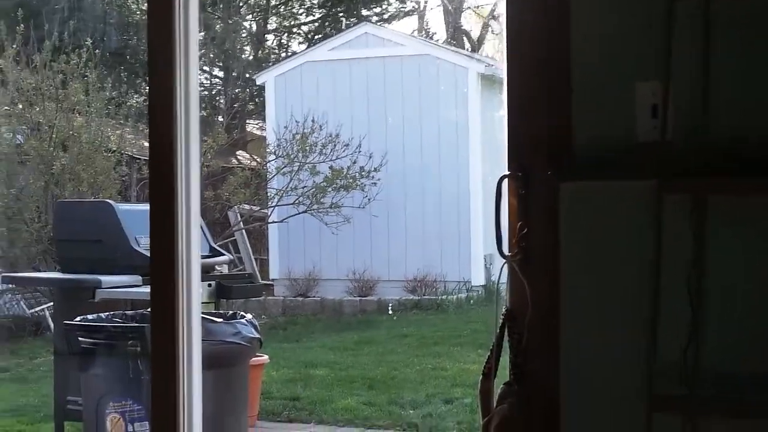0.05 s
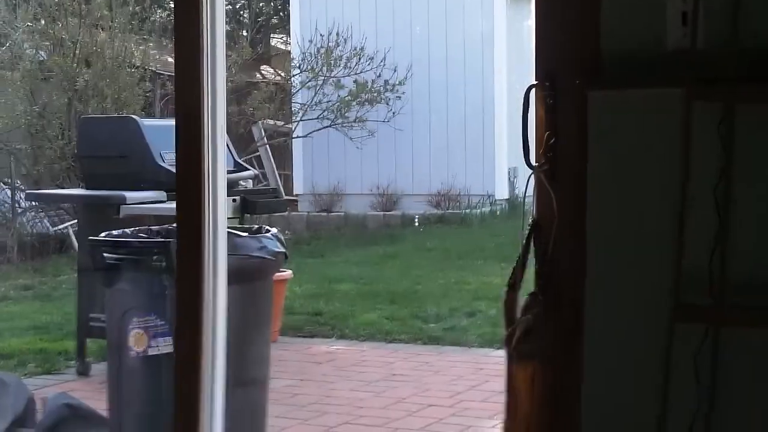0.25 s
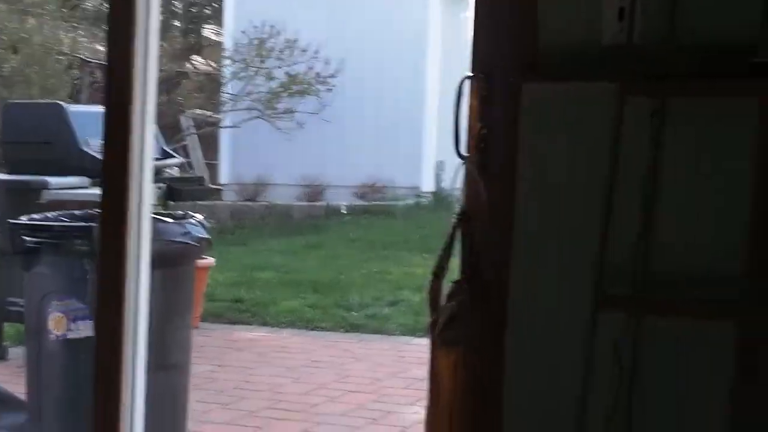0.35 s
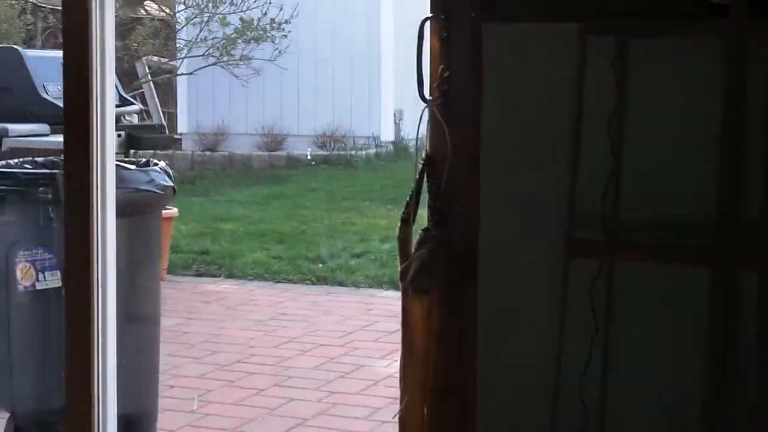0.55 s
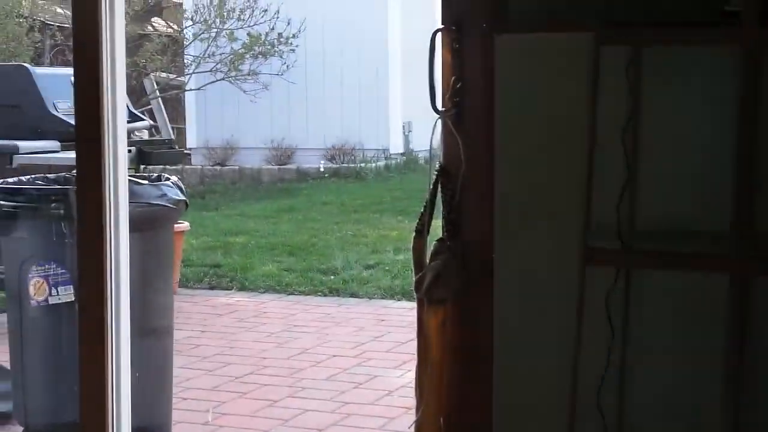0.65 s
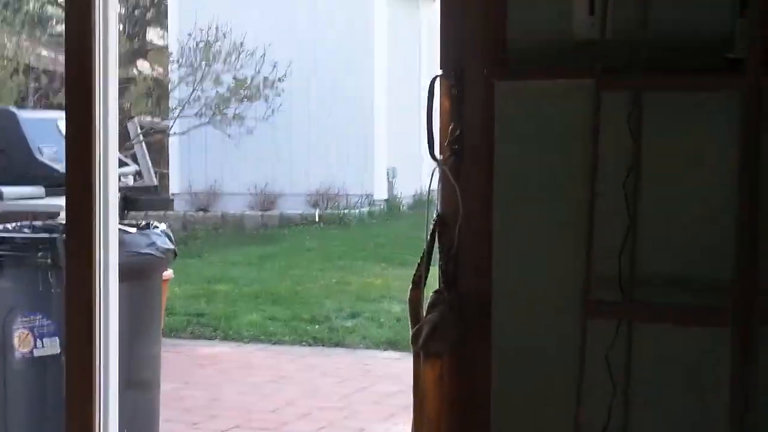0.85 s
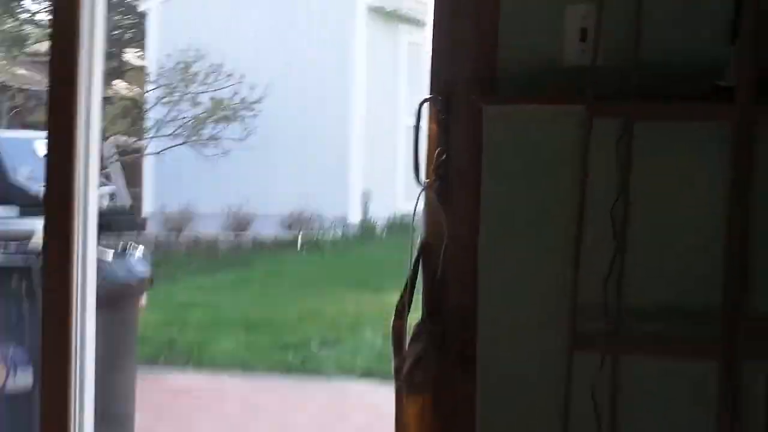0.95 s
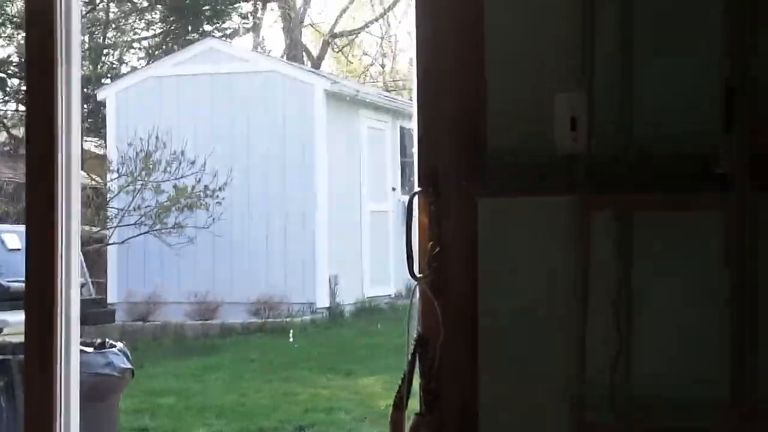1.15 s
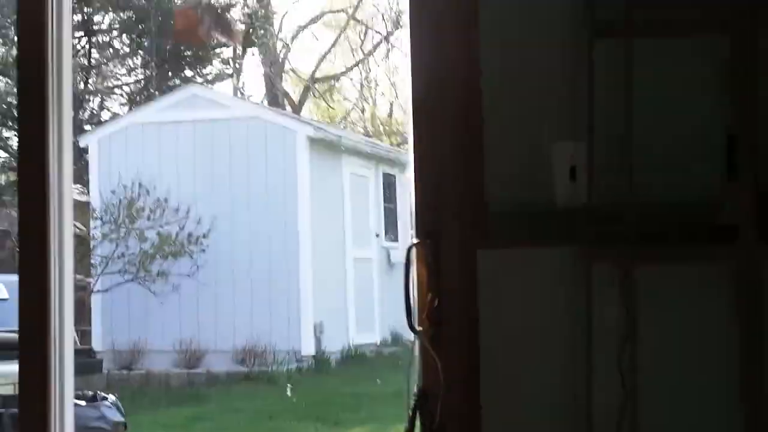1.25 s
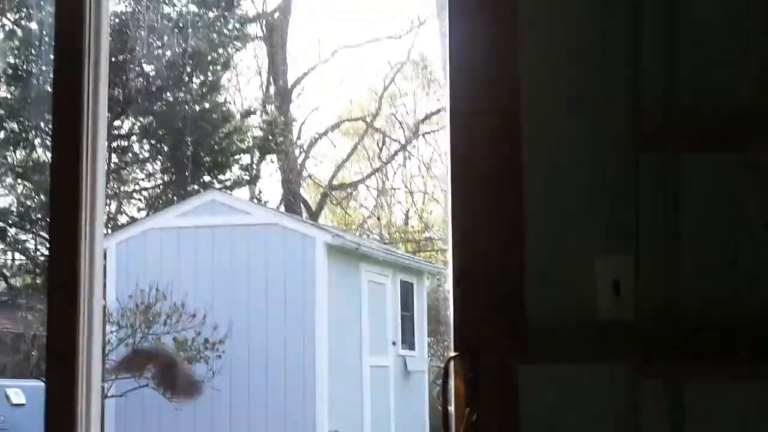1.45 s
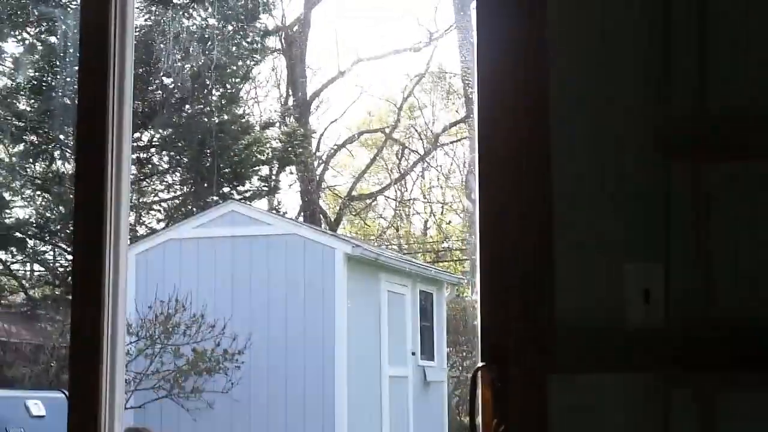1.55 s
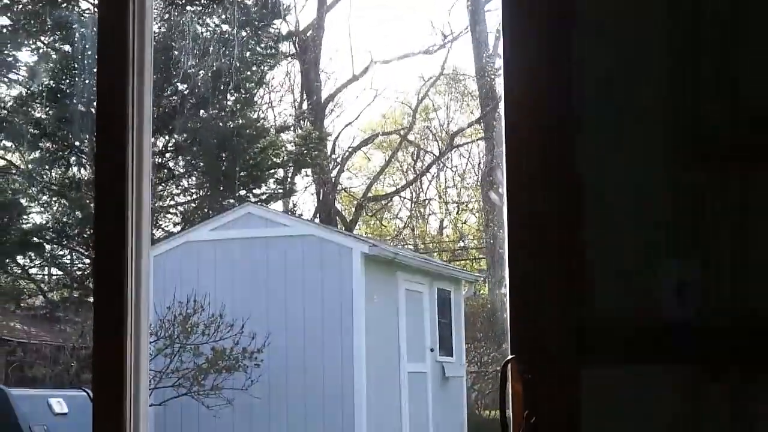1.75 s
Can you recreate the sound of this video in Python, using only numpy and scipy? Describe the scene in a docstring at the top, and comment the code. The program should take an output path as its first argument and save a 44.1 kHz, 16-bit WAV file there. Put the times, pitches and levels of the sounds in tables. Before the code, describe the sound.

A bird thumps against a glass door, heard indoors over low room noise and handling rumble. At 0.2 seconds a small sharp click sounds by the microphone, then a light cloth swish. A whoosh rises from about 0.55 seconds until the dull strike at 0.85, with a brief ring, low boom and brush of feathers. A weaker bump follows near 1.1 seconds and dies away.

```python
"""Indoors by a glass door, hand-held microphone. Low room noise, handling rumble and a faint rustle lie
underneath from the start. At 0.2 s comes a sharp little click right at the microphone, then a light
swish of cloth. From 0.55 s a whoosh of air rises until a bird strikes the glass at 0.85 s: its soft
body thuds, the pane rings briefly and booms as it flexes, and feathers brush it. At 1.06 s a weaker
bump knocks in the frame and dies away in the room."""
import sys
import numpy as np
from scipy import signal
from scipy.fft import rfft, irfft, next_fast_len
from scipy.io import wavfile
from scipy.ndimage import map_coordinates

SR = 44100
rng = np.random.default_rng(int(sys.argv[2]) if len(sys.argv) > 2 else 0)


def log_audio(samples):
    """Write samples as a 16-bit WAV file to the path given in sys.argv[1]."""
    # one column per channel
    frames = np.atleast_2d(samples).T
    # limit to full scale, then quantise
    limited = np.clip(frames, -1, 1)
    pcm = np.round(limited * 32767).astype(np.int16)
    wavfile.write(sys.argv[1], SR, pcm)


N = 79380  # 1.8 s
STRIKE_S, PRESS_S = .8545, .8803  # the bird meets the glass, then its body presses in


def amp(db):
    """Decibels to amplitude."""
    return 10 ** (np.asarray(db) / 20)


def clock():
    """Each sample's time in seconds."""
    return np.arange(N) / SR


def along(points, hz):
    """Read (Hz, value) points on a log frequency axis."""
    freqs, values = np.transpose(points)
    return np.interp(np.log(hz + 1), np.log(freqs + 1), values)


def curves(rows):
    """One value per sample for each column after the time."""
    times, *columns = np.transpose(rows)
    return [np.interp(clock(), times, column) for column in columns]


def filtered(x, response):
    """Pass x through a frequency response."""
    size = next_fast_len(N + SR // 2)
    return irfft(rfft(x, size) * response(np.fft.rfftfreq(size, 1 / SR)), size)[..., :N]


def noise(colour):
    """Coloured noise of rms 1."""
    x = filtered(rng.standard_normal(N), lambda hz: amp(along(colour, hz)))
    return x / np.sqrt(np.mean(x ** 2) + 1e-20)


def swelling_noise(level, colour):
    """Coloured noise that follows a level curve."""
    return amp(curves(level)[0]) * noise(colour)


def blow(start, rise, t60, hold=0):
    """Envelope with a soft attack, a hold and an exponential decay, all in seconds."""
    age = np.maximum(clock() - start, 0)
    return (1 - np.exp(-(age / rise) ** 2)) * amp(-60 * np.maximum(age - hold, 0) / t60)


def ring(start, hz, rise, t60, hold=0):
    """One struck mode: a decaying sine."""
    return -np.sin(2 * np.pi * hz * (clock() - start)) * blow(start, rise, t60, hold)


def pulse(start, colour):
    """One impulse through a causal filter of the given colour."""
    size = 8192
    gain = amp(along(colour, np.fft.rfftfreq(size, 1 / SR)))
    cepstrum = irfft(np.log(gain))
    cepstrum[1:size // 2] *= 2  # fold to minimum phase
    cepstrum[size // 2 + 1:] = 0
    impulse = irfft(np.exp(rfft(cepstrum)))
    return filtered(impulse, lambda hz: np.exp(-2j * np.pi * hz * start))


# Loudness of the room: time_s, level_db
ROOM_LEVEL = [(0, -54.5), (.6, -52), (1.2, -56.5), (1.45, -55), (1.62, -59), (1.8, -60)]
# Its spectrum: freq_hz, relative_db
ROOM_COLOUR = [(30, -13.5), (170, -0.5), (260, 0), (340, -1.5), (520, -2.5), (780, -2.5), (1100, -11),
               (2000, -14), (4000, -25), (10000, -28.5), (14500, -33)]

def room_noise():
    """Low, steady noise all around the microphone, drifting in level."""
    return swelling_noise(ROOM_LEVEL, ROOM_COLOUR)


# Surges of handling rumble: time_s, level_db
RUMBLE_LEVEL = [(0, -44.5), (.045, -41), (.09, -50.5), (.17, -45.5), (.24, -47), (.285, -52), (.32, -46),
                (.47, -47.5), (.62, -48), (.665, -70), (.72, -43), (.95, -48), (1.04, -53), (1.19, -45),
                (1.29, -52), (1.43, -48.5), (1.63, -54), (1.8, -51.5)]
# Its spectrum: freq_hz, relative_db
RUMBLE_COLOUR = [(20, -43), (32, -23.5), (44, 4), (62, -4), (80, 1.5), (100, -14), (135, -3), (178, 1.5),
                 (215, -5), (265, -5.5), (340, -12.5), (500, -20.5), (6000, -78.5)]

def handling_rumble():
    """The microphone moves in the hand and picks up an uneven rumble."""
    return swelling_noise(RUMBLE_LEVEL, RUMBLE_COLOUR)


# Swells of rustle: time_s, level_db
RUSTLE_LEVEL = [(0, -66), (.13, -54.5), (.28, -56), (.33, -56.5), (.42, -50), (.52, -55.5), (.62, -55.5),
                (.72, -51.5), (1.0, -51), (1.2, -64)]
# Its spectrum, peaking at 430 Hz: freq_hz, relative_db
RUSTLE_COLOUR = [(150, -18.5), (330, 1), (385, -1.5), (430, 12.5), (490, -2.5), (1000, -10.5), (2400, -13),
                 (4000, -17), (8500, -19.5), (14500, -26)]

def rustle():
    """Faint rustle of movement close to the microphone."""
    return swelling_noise(RUSTLE_LEVEL, RUSTLE_COLOUR)


# Spectrum of the click: freq_hz, relative_db
CLICK_COLOUR = [(20, -17), (90, -1), (250, -10), (600, -21.5), (1200, -28.5), (2500, -24.5), (4500, -32.5),
                (5300, -17), (6300, -12.5), (6900, -20), (7600, -8.5), (9000, -3.5), (11000, 0),
                (14500, -5), (17000, -27)]

def click(start_s=.20916, echo_delay_s=.0076):
    """A tiny hard snap right at the microphone: a low push, a short scatter, one near reflection."""
    snap = pulse(start_s, CLICK_COLOUR)
    reflection = amp(-30) * pulse(start_s + echo_delay_s, CLICK_COLOUR)
    scatter = amp(-43.5) * noise(CLICK_COLOUR) * blow(start_s, rise=.00037, t60=.049)
    return amp(10.5) * (snap + reflection) + scatter


# One swell of moving cloth: time_s, level_db
SWISH_LEVEL = [(.3, -85), (.38, -64.5), (.43, -60), (.5, -64), (.6, -71), (.7, -100)]
# Its hissy spectrum: freq_hz, relative_db
SWISH_COLOUR = [(2000, -20), (4500, -7.5), (8000, 0), (11000, -3), (14500, -8)]

def cloth_swish():
    """Cloth slides lightly, close to the microphone."""
    return swelling_noise(SWISH_LEVEL, SWISH_COLOUR)


# Rush of air and its resonance: time_s, level_db, centre_hz, width_octaves
WHOOSH_PATH = [(.55, -58.5, 330, 0.24), (.62, -43.5, 365, 0.3), (.66, -54.5, 540, 0.65),
               (.70, -44.5, 680, 0.17), (.73, -48, 1030, 0.97), (.78, -43.5, 1360, 0.8),
               (.81, -44, 1180, .8), (.85, -40.5, 1040, .8), (.88, -41, 2350, 0.96), (.91, -87, 2300, 0.64),
               (1.0, -60.5, 1950, 0.69), (1.2, -110, 2000, .8)]
# Spectrum of the broad hiss around it: freq_hz, relative_db
AIR_COLOUR = [(200, -10), (700, 0.5), (2500, -2), (4500, -10), (10000, -12), (14500, -17)]

def whoosh():
    """Rushing air at the door; its broad resonance climbs as it swells towards the strike."""
    level_db, centre_hz, width_oct = curves(WHOOSH_PATH)
    hz, frame_s, spectrum = signal.stft(rng.standard_normal(N), SR, nperseg=512)
    octaves = np.log2((hz[:, None] + 1) / np.interp(frame_s, clock(), centre_hz))
    resonance = np.exp(-(octaves / np.interp(frame_s, clock(), width_oct)) ** 2)
    low_shelf = amp(-2) / (1 + np.exp(4 * (octaves - 1)))
    shape = resonance + low_shelf
    shape /= np.sqrt(np.mean(shape ** 2, axis=0))  # equal power at every moment
    body = signal.istft(spectrum * shape, SR, nperseg=512)[1][:N]
    hiss = amp(-5) * width_oct / width_oct.max() * noise(AIR_COLOUR)
    swell = amp(level_db) * (clock() > WHOOSH_PATH[0][0])
    return swell * (body + hiss)


# Spectrum of the body's impact: freq_hz, relative_db
THUD_COLOUR = [(60, -12), (250, 4), (370, -11), (540, -1.5), (720, 6), (950, -6), (1250, -1), (1700, -16),
               (3000, -16), (6000, -30), (14000, -33)]

def body_thud():
    """The soft body hits the glass: one dull pulse in a short burst of noise."""
    impact = amp(-2) * pulse(STRIKE_S + .00194, THUD_COLOUR)
    burst = amp(-35) * noise(THUD_COLOUR) * blow(STRIKE_S, rise=.0015, t60=.076)
    return impact + burst


# Ringing modes of the pane: pitch_hz, relative_db, t60_s
PANE_MODES = [(349.7, -1.5, 0.15), (449, -12, 0.2), (655, -17, .2), (846, -3.5, 0.17), (940.5, -1, 0.16),
              (1001, -3.5, 0.17), (1404, -16, .24), (1554, -12, 0.15), (1622, -9, 0.15), (2162, -7, 0.13),
              (2284, -7.5, 0.14), (2590, -17, .14), (2745, -33, .13), (3125, -9, 0.14)]

def pane_ring(level_db=-33, lag_s_per_octave=.016, mute_db=-10, mute_s=.022):
    """The struck pane rings until the pressing body mutes it."""
    modes = np.zeros(N)
    for hz, db, t60 in PANE_MODES:
        # the contact hardens, so modes above 1100 Hz start later
        onset_s = STRIKE_S + lag_s_per_octave * max(np.log2(hz / 1100), 0)
        modes += amp(level_db + db + rng.normal(0, 1)) * ring(onset_s, hz, rise=.0018, t60=t60)
    pressure = np.clip((clock() - PRESS_S) / mute_s, 0, 1)
    return modes * amp(mute_db * pressure)


# Flexing modes of the whole pane: pitch_hz, level_db, t60_s
BOOM_MODES = [(140, -31, 0.072), (78, -48.5, 0.053), (227, -35.5, 0.081), (291, -40, 0.028)]

def pane_boom(press_length_s=.016):
    """The whole pane flexes with a low boom, held while the body presses on it."""
    return sum(amp(db) * ring(PRESS_S, hz, rise=.0021, t60=t60, hold=press_length_s)
               for hz, db, t60 in BOOM_MODES)


# Spectrum of feathers on glass: freq_hz, relative_db
FEATHER_COLOUR = [(500, -0.5), (1600, -2), (4500, -2.5), (5700, 1), (6150, 5), (6700, -1), (9000, -3),
                  (13500, -9), (15000, -21)]

def feather_brush(start_s=.8815, grain_hz=700.6, grain_db=3.5):
    """Feathers brush the pane with a short, grainy hiss."""
    flicker = map_coordinates(rng.standard_normal(N), [clock() * grain_hz])  # smooth random curve
    hiss = noise(FEATHER_COLOUR) * amp(grain_db * flicker)
    return amp(-32) * hiss * blow(start_s, rise=.0054, t60=.11)


# Spectrum of the light first touch: freq_hz, relative_db
TOUCH_COLOUR = [(100, 15), (230, 11), (500, 12.5), (2500, 3.5), (5500, -10), (7000, 6), (8800, -5),
                (10500, -8), (14500, -18)]
# Spectrum of the knock in the frame: freq_hz, relative_db
KNOCK_COLOUR = [(80, -16), (190, 0.5), (300, -1), (520, 0.5), (740, -2), (950, -4.5), (1400, -12.5),
                (2000, -21.5), (3200, -29), (8500, -31.5), (14000, -52)]
# Modes of the door frame: pitch_hz, relative_db, t60_s
FRAME_MODES = [(177, -45, .1), (513, -45, 0.26), (558.6, -45.5, 0.31), (910, -50, 0.27), (1008, -52, 0.2)]
# Spectrum of the rattle: freq_hz, relative_db
RATTLE_COLOUR = [(500, -10), (1800, -5), (3200, -28), (3900, 6), (4600, 5.5), (5600, -22), (8500, -14),
                 (14000, -37)]

def frame_bump(touch_s=1.057, knock_s=1.064):
    """A light touch, then a dull knock that rings the door frame, with a brief bright rattle."""
    touch = amp(-43.5) * noise(TOUCH_COLOUR) * blow(touch_s, rise=.0011, t60=.075)
    knock = amp(-38.5) * noise(KNOCK_COLOUR) * blow(knock_s, rise=.0017, t60=.22, hold=.013)
    modes = sum(amp(db - 1) * ring(knock_s, hz, rise=.003, t60=t60) for hz, db, t60 in FRAME_MODES)
    rattle = amp(-47.5) * noise(RATTLE_COLOUR) * blow(knock_s, rise=.006, t60=.16)
    return touch + knock + modes + rattle


# Decay of the room: freq_hz, t60_s
ROOM_DECAY = [(150, 0.29), (1000, 0.61), (4000, .36), (12000, 0.22)]

def reverb(x):
    """The room's tail reaches the microphone 5 ms late; each frequency dies at its own speed."""
    hz, frame_s, spectrum = signal.stft(rng.standard_normal(SR // 2), SR, nperseg=256)
    decay = amp(-60 * frame_s / along(ROOM_DECAY, hz)[:, None])
    tail = signal.istft(spectrum * decay, SR, nperseg=256)[1]
    tail /= np.linalg.norm(tail)
    return signal.fftconvolve(x, np.pad(tail, (SR // 200, 0)))[:N]


def scene():
    """One microphone indoors: the door is heard with the room around it, the close click almost dry."""
    door = whoosh() + body_thud() + pane_ring() + pane_boom() + feather_brush() + frame_bump()
    close = click()
    room_tail = amp(-8.5) * reverb(door) + amp(-29) * reverb(close)
    background = room_noise() + handling_rumble() + rustle() + cloth_swish()
    return (door + close + room_tail + background)[None]


def record(dry):
    """The hand-held camera's sound cuts off steeply at its band limit."""
    top_hz, edge_hz = 14650, 300
    return filtered(dry, lambda hz: np.clip((top_hz - hz) / edge_hz + .5, 0, 1))


dry = scene()
out = record(dry)
log_audio(out)
```